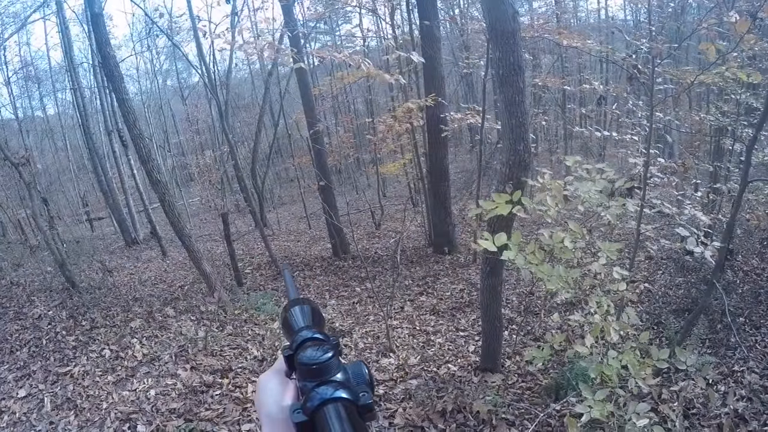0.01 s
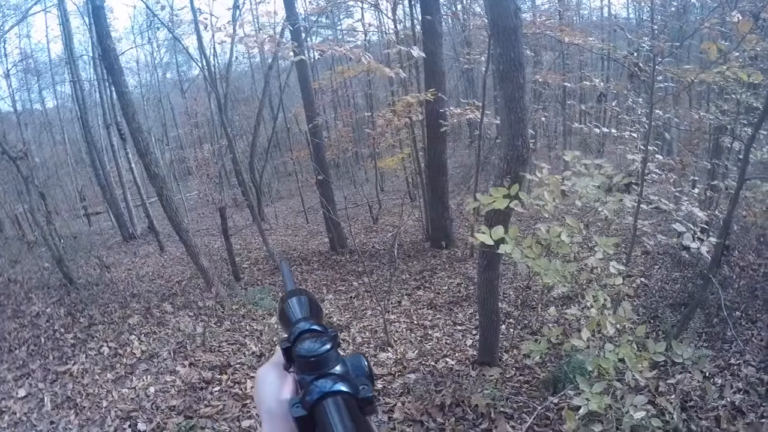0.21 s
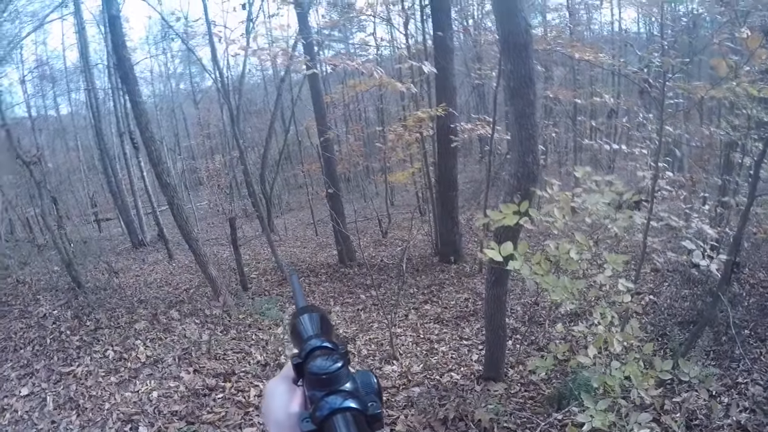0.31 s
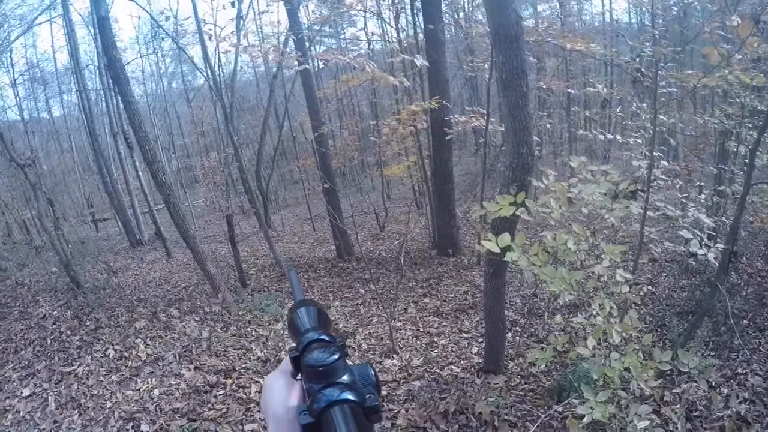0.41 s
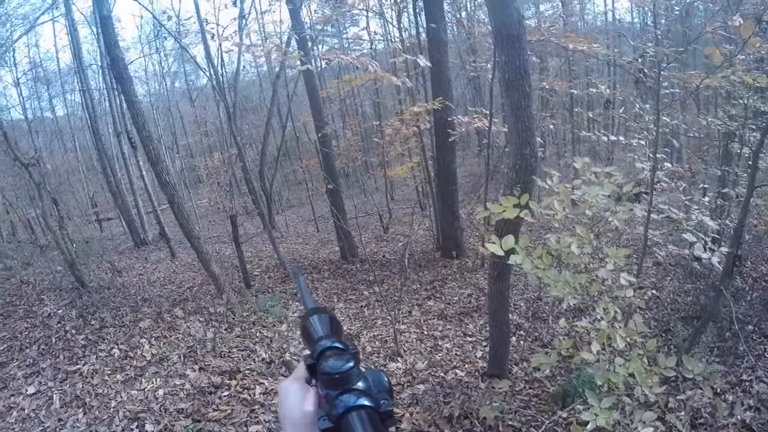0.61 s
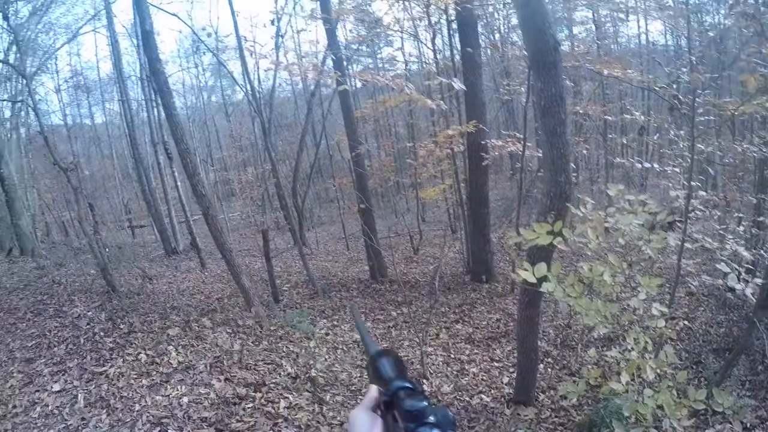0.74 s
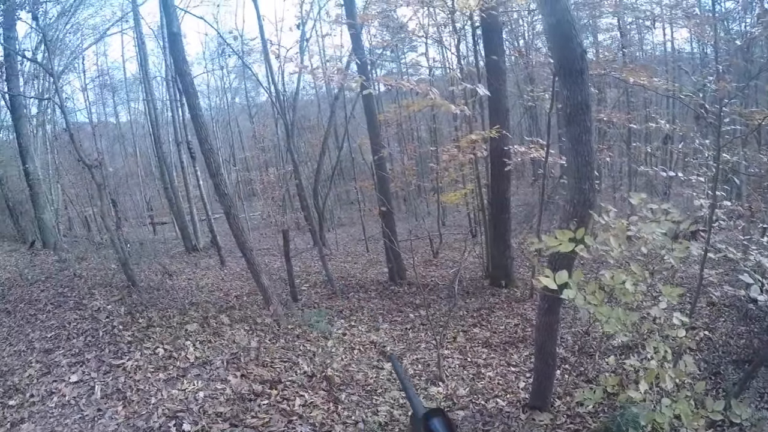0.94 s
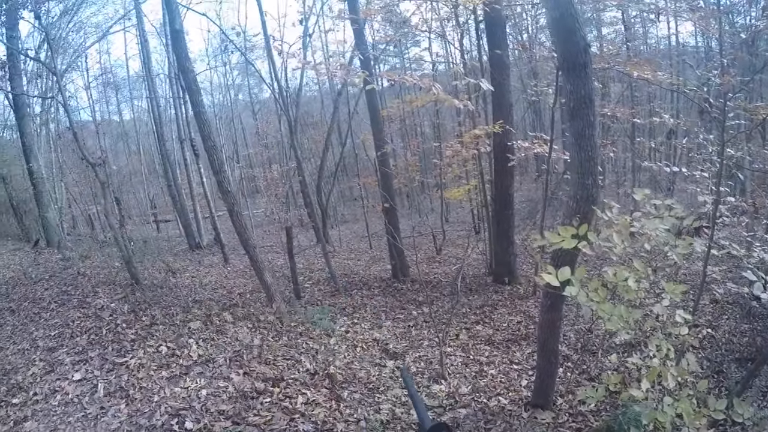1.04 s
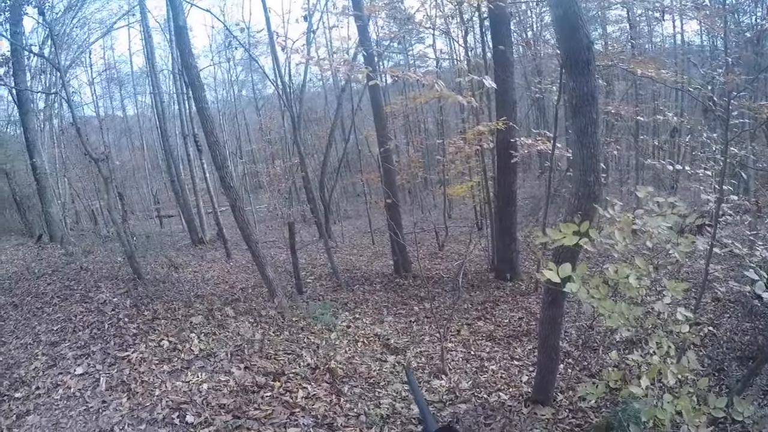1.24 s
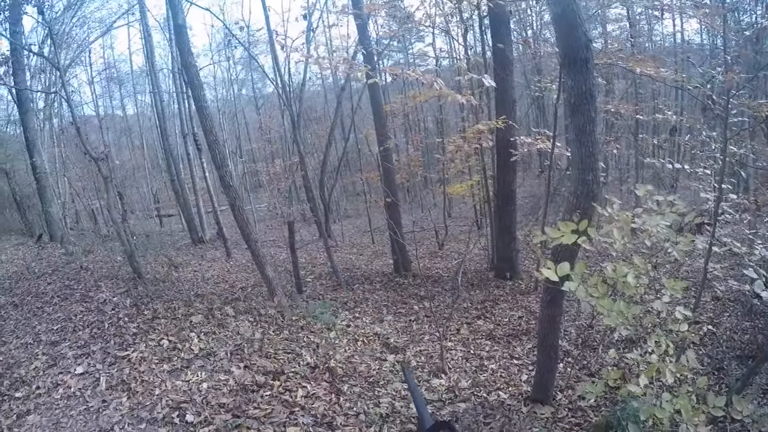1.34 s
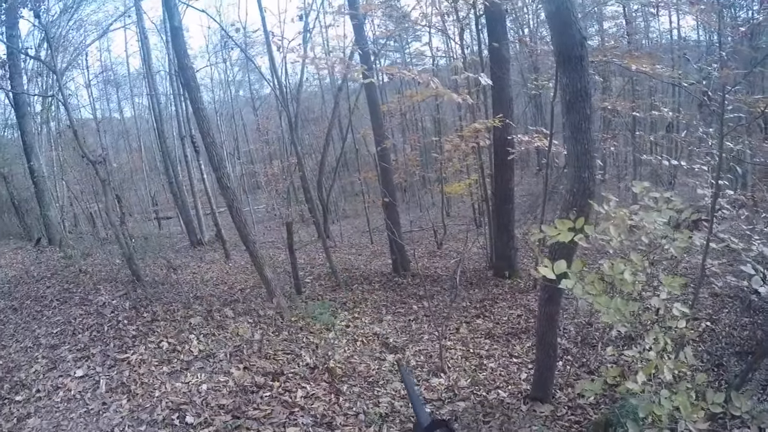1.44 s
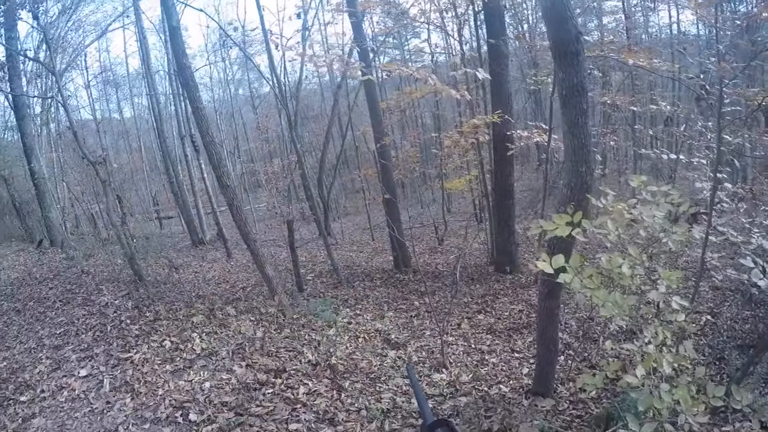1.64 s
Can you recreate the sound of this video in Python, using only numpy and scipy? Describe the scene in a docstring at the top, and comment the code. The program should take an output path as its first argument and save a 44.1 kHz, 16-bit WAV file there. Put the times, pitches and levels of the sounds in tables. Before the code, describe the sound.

A rifle shot bursts out after a brief quiet moment, overloading a head-worn microphone; sharp echoes scatter off tree trunks, a duller roll fades through the woods, then two small metallic clicks as the rifle is lowered.

```python
"""Rifle shot in open woods

One shot heard from the shooter's head: bright noise bursts make the crack, an N-shaped pressure wave the blast.
Spikes with short noise sprays echo from trunks; fading noise bands roll on from forest and slopes, ever duller.
The microphone overloads and its gain ducks, then slowly recovers. The rifle is lowered with a soft
rumble of filtered noise and two small groups of ringing metal clicks, over a faint hiss and one rustle."""
import sys
import numpy as np
from scipy import signal
from scipy.fft import rfft, irfft
from scipy.io import wavfile
from scipy.ndimage import uniform_filter1d

SR = 44100
rng = np.random.default_rng(int(sys.argv[2]) if len(sys.argv) > 2 else 0)


def dump(signal):
    """Clip the signal to [-1, 1] and save it as 16-bit WAV at the path in sys.argv[1]."""
    limited = np.clip(np.atleast_2d(signal).T, -1, 1)
    pcm = np.round(limited * 32767).astype(np.int16)
    wavfile.write(sys.argv[1], SR, pcm)


N = 74970
TIME = np.arange(N) / SR   # s


def from_db(db):
    """Decibels to gain."""
    return 10 ** (np.asarray(db) / 20)


def rms_one(x):
    """Scale to unit rms."""
    return x / np.sqrt(np.mean(x ** 2) + 1e-20)


def at_hz(points, hz):
    """Read every column of a table at a frequency, in between rows on a log scale."""
    freqs, *columns = np.transpose(points)
    return [np.interp(np.log(hz), np.log(freqs), column) for column in columns]


def colour(x, points):
    """Filter with the given spectrum that never sounds ahead of its input; white noise keeps its power."""
    size = 2 * N
    freqs = np.arange(N + 1) * SR / size + 1   # the 1 Hz shift avoids log(0)
    gain = rms_one(from_db(at_hz(points, freqs)[0]))
    # folding the cepstrum onto positive times gives the minimum-phase filter
    cepstrum = irfft(np.log(gain))
    cepstrum[1:N] *= 2
    cepstrum[N + 1:] = 0
    response = np.exp(rfft(cepstrum))
    return irfft(rfft(x, size) * response)[:N]


def butterworth(x, order, hz, kind="low"):
    """Smooth low-pass or high-pass filter."""
    return signal.sosfilt(signal.butter(order, hz, kind, fs=SR, output="sos"), x)


def noise_bands():
    """Quarter-octave bands of noise as (centre Hz, band), unit power per octave."""
    edges = 25.7 * 2 ** (np.arange(38) / 4)
    white = rfft(rng.standard_normal(N))
    freqs = np.fft.rfftfreq(N, 1 / SR)
    for low, high in zip(edges, edges[1:]):
        band = irfft(white * (freqs >= low) * (freqs < high), N)
        yield np.sqrt(low * high), rms_one(band) / 2


def flicker(span_s):
    """Random wobble of rms 1 that changes over the given time."""
    return rms_one(uniform_filter1d(rng.standard_normal(N), max(2, int(span_s * SR))))


def dying(start, t60):
    """Exponential decay from a start time, falling 60 dB in t60 seconds."""
    return (TIME >= start) * np.exp(-np.log(1000) * np.maximum(TIME - start, 0) / t60)


def impulses(rows, scatter, t60):
    """Each row is a spike with a fading noise spray; scatter is the spray's first rms next to the spike."""
    out = np.zeros(N)
    for s, db in rows:
        out += from_db(db) * scatter * dying(s, t60) * rng.standard_normal(N)
        out[min(int(s * SR), N - 1)] += from_db(db)
    return out


def ring(x, hz, t60):
    """One decaying mode: a two-pole resonator struck by x."""
    radius = np.exp(-np.log(1000) / (t60 * SR))
    angle = 2 * np.pi * hz / SR
    feedback = [1, -2 * radius * np.cos(angle), radius * radius]
    return signal.lfilter([0, np.sin(angle)], feedback, x + 1e-18)


# steady hiss of the quiet woods: (f/Hz, level/dB per octave)
AIR_HISS = [(50, -72.5), (350, -65), (900, -75.5), (2400, -67.5), (5500, -67.5), (8000, -73.5),
            (14000, -75.5)]
# spectrum of the faint, high rustle: (f/Hz, relative level/dB)
RUSTLE_SPECTRUM = [(3000, -25), (8000, -12), (9700, 3), (11500, -9), (15000, -10)]
RUSTLE_S, RUSTLE_WIDTH_S, RUSTLE_DB = .85, .035, -70


def air():
    """Faint steady hiss from noise bands, and one brief rustle that swells and fades."""
    swell = np.exp(-((TIME - RUSTLE_S) / RUSTLE_WIDTH_S) ** 2)
    rustle = swell * colour(rng.standard_normal(N), RUSTLE_SPECTRUM)
    hiss = sum(from_db(at_hz(AIR_HISS, hz)[0]) * band for hz, band in noise_bands())
    return hiss + from_db(RUSTLE_DB) * rustle


# loudness of the movement rumble: (t/s, level/dB)
RUMBLE_LEVEL = [(0, -66.5), (.085, -44.5), (.125, -51), (.2, -53.5), (.46, -49), (.53, -62), (1.1, -57.5),
                (1.24, -52.5), (1.45, -53), (1.55, -41.5), (1.62, -50), (1.7, -49)]
# spectrum of the rumble: (f/Hz, relative level/dB)
RUMBLE_SPECTRUM = [(8, -17.5), (20, -3.5), (33, 1), (55, -11), (100, -25), (300, -31), (600, -43),
                   (2000, -76)]


def movement_rumble():
    """Movement at the microphone: low noise whose level rises and falls."""
    noise = rms_one(colour(rng.standard_normal(N), RUMBLE_SPECTRUM))
    return from_db(np.interp(TIME, *np.transpose(RUMBLE_LEVEL))) * noise


# touches of the rifle's metal parts: (t/s, level/dB, low edge f/Hz, share that rings 0-1)
METAL_TOUCHES = [(1.5385, -46, 3000, .8), (1.553, -22, 500, .4), (1.5542, -22.5, 500, .9),
                 (1.5550, -26.5, 700, 0.8), (1.6837, -36, 3500, 0.83), (1.6857, -25, 2005, 0.25),
                 (1.6869, -24.5, 2000, 0.33), (1.6886, -32.5, 2500, .15), (1.6975, -37, 900, .3)]
# spectrum of the dry knocks: (f/Hz, relative level/dB)
KNOCK_SPECTRUM = [(300, -7), (1000, 4), (1450, -5), (2000, 2), (2800, 5.5), (3400, -3), (4000, -1),
                  (5700, 0.5), (7500, -10.5), (11000, -11), (15000, -18.5)]
# ringing modes of the metal: (f/Hz, level/dB, t60/s)
METAL_MODES = [(990, -36, 0.0091), (2770, -27, .007), (4050, -30, 0.0064), (5000, -26, .012),
               (5300, -17.5, 0.023), (5500, -30, .025), (6630, -29, .013)]


def metal_clicks():
    """Metal parts touch: each spike gives a dry knock and strikes modes that ring briefly."""
    knocks, striking = 0, 0
    for s, db, low_hz, ringing_share in METAL_TOUCHES:
        spike = impulses([(s, db)], scatter=.19, t60=.0084)
        touch = butterworth(spike, 2, low_hz, "high")
        knocks = knocks + touch
        striking = striking + ringing_share * touch
    metal = sum(from_db(db) * ring(striking, hz, t60) for hz, db, t60 in METAL_MODES)
    return colour(knocks, KNOCK_SPECTRUM) + metal


RETURNS_START_S, RETURNS_RISE_S = .2225, .007


def returns(table, rough_db, grain_s, patchy_db):
    """Countless small echoes merge into grainy, patchy noise that dies band by band."""
    out = 0
    for hz, band in noise_bands():
        db, t60 = at_hz(table, hz)
        patchy_level = from_db(db + patchy_db * flicker(.025))
        out = out + patchy_level * band * dying(RETURNS_START_S, t60)
    onset = np.clip((TIME - RETURNS_START_S) / RETURNS_RISE_S, 0, 1)
    grain = rms_one(from_db(rough_db * flicker(grain_s)))
    return out * onset * grain


# diffuse returns from the forest: (f/Hz, level/dB per octave, t60/s)
FOREST_RETURNS = [(60, -56, 2.1), (189.6, -46, 1.59), (347, -29, 1.5), (990, -27.5, 1.6), (2018, -20, 1.74),
                  (3052, -17, 1.42), (3653, -25, 1.47), (6003, -25.5, 1.114), (7900, -37.5, 1.0),
                  (14000, -53, 0.59)]
# diffuse returns from far slopes: (f/Hz, level/dB per octave, t60/s)
SLOPE_RETURNS = [(101, -68.5, 3), (214.2, -55, 5), (356, -39.5, 5.1), (693.6, -42, 4.91), (1279, -37, 4.5),
                 (2560, -38.5, 4.74), (3053, -42, 4.4), (3600, -54, 3.5), (7000, -76.5, 2.6)]
# diffuse returns from undergrowth: (f/Hz, level/dB per octave, t60/s)
UNDERGROWTH_RETURNS = [(40, -26, 0.51), (120.2, -19, 0.41), (399.3, -19, 0.5), (1000, -23.5, 0.51),
                       (2530, -8.5, 0.51), (5700, -4, 0.37), (7800, -14.5, .38), (14000, -14, 0.28)]
# the rolling echo swells, or dips, as slopes answer: (t/s, width/s, gain/dB)
SLOPE_SWELLS = [(.575, .055, 2), (.91, 0.028, -1.5), (.975, 0.024, 3), (1.095, 0.037, 3.5),
                (1.43, 0.051, 2.5)]


def woods():
    """The undergrowth's echo fades fastest; forest and slopes roll on in swells."""
    forest = returns(FOREST_RETURNS, rough_db=1.5, grain_s=.003, patchy_db=1.3)
    slopes = returns(SLOPE_RETURNS, rough_db=.63, grain_s=.006, patchy_db=1.45)
    undergrowth = returns(UNDERGROWTH_RETURNS, rough_db=2.0, grain_s=.002, patchy_db=.93)
    swell_db = sum(db * np.exp(-((TIME - s) / width) ** 2) for s, width, db in SLOPE_SWELLS)
    return undergrowth + from_db(swell_db) * (forest + slopes)


# sharp echoes from single trunks: (t/s, level/dB)
TRUNK_ECHOES = [(0.2298, 6), (0.2323, 0), (0.2395, 16.5), (0.2408, 12), (0.2505, -9), (0.2524, 19),
                (0.2555, 22.5), (0.2585, 12), (0.2788, 14), (0.2807, 5), (0.2868, 16), (0.2882, 3),
                (0.2897, 17.5), (0.3005, -7), (0.3062, 2), (0.3222, 5), (0.3240, -2), (0.3258, -9),
                (0.3328, 2), (0.3490, 2), (0.3505, -4), (0.3745, -2)]
# their spectrum: (f/Hz, relative level/dB)
TRUNK_SPECTRUM = [(100, -10), (400, -7.5), (900, -7.5), (2000, 0), (3500, 1), (5800, 0.5), (7500, -24),
                  (15000, -21.5)]
# low thuds of the blast off ground and thick trunks: (t/s, level/dB)
BLAST_THUDS = [(0.2395, 15), (0.2556, 8), (0.2600, 10.5), (0.2885, -2), (0.3225, 5), (0.3270, 7)]
# their spectrum: (f/Hz, relative level/dB)
THUD_SPECTRUM = [(30, -14), (70, -5), (130, 0), (220, -5), (320, -1), (550, -9), (1000, -25), (3000, -55)]
# dull, distant slaps: (t/s, level/dB)
FAR_SLAPS = [(0.6420, -14), (0.8229, -16), (0.8238, -10), (0.9612, -16.5)]
# their spectrum: (f/Hz, relative level/dB)
SLAP_SPECTRUM = [(300, -20), (750, -9), (1100, 4.5), (2000, 0), (3000, -11), (5000, -38), (12000, -67)]


def echoes():
    """Single reflections as filtered spikes: sharp near trunks, low thuds and far slaps."""
    trunks = colour(impulses(TRUNK_ECHOES, scatter=.165, t60=.015), TRUNK_SPECTRUM)
    thuds = colour(impulses(BLAST_THUDS, scatter=.03, t60=.03), THUD_SPECTRUM)
    slaps = colour(impulses(FAR_SLAPS, scatter=.06, t60=.031), SLAP_SPECTRUM)
    return trunks + thuds + slaps


# the blast's brief ring: (f/Hz, level/dB, t60/s)
BLAST_MODES = [(285, -41.5, 0.026), (435, -42, .022), (620.7, -40, .025)]
BLAST_S, BLAST_LENGTH_S, BLAST_DB = .2229, .00647, 19.5
BLAST_LOW_HZ, BLAST_HIGH_HZ = 25, 1020
BLAST_BEND = .82   # below 1 the pressure swings back early


def blast():
    """The muzzle's N-shaped pressure wave, band-limited, sets off a brief ring."""
    phase = (TIME - BLAST_S) / BLAST_LENGTH_S
    wave = (2 * np.clip(phase, 0, 1) ** BLAST_BEND - 1) * (phase >= 0) * (phase < 1)
    wave = butterworth(wave, 2, BLAST_HIGH_HZ)
    wave = butterworth(wave, 1, BLAST_LOW_HZ, "high")
    slope = np.gradient(wave)
    body = 0
    for hz, db, t60 in BLAST_MODES:
        body = body + from_db(db) * ring(slope, hz, t60) * SR / (2 * np.pi * hz)
    return from_db(BLAST_DB) * (wave + body)


# bright bursts from the action to the muzzle crack and its ground bounce: (t/s, length/s, level/dB)
CRACK_BURSTS = [(0.2138, 0.0023, -14), (0.2165, 0.0034, 4), (0.217, 0.00032, 3.5), (0.2203, .0024, 27),
                (0.2274, 0.00067, 21)]
# their spectrum: (f/Hz, relative level/dB)
CRACK_SPECTRUM = [(200, -18), (1000, -11.5), (1500, -6.5), (2500, 0), (4000, -0.5), (6000, 3.5),
                  (7500, -9.5), (12000, -7.5), (16000, -6.5)]


def crack():
    """Very short bursts of bright noise: each starts at once, holds, then drops sharply."""
    level = 0
    for s, length, db in CRACK_BURSTS:
        fall = np.exp(-np.maximum(TIME - s - length, 0) / .000097)
        level = level + from_db(db) * (TIME >= s) * fall
    return colour(level * rng.standard_normal(N), CRACK_SPECTRUM)


def scene():
    """Everything at one microphone."""
    shot = crack() + blast()
    answer = echoes() + woods()
    handling = metal_clicks() + movement_rumble()
    return (shot + answer + handling + air())[None]


OVERLOAD_DB, CEILING_DB = 14, -.67
RELEASE_DB_PER_S, LOOKAHEAD_S = 11, .00821
CUTOFF_HZ = 15800


def record(dry):
    """The input overloads, the gain ducks just ahead of loud peaks and recovers slowly, the top is cut."""
    top = from_db(OVERLOAD_DB)
    x = top * np.tanh(dry[0] / top)
    over_db = np.maximum(20 * np.log10(np.abs(x) + 1e-9) - CEILING_DB, 0)
    # hold the largest duck so far, less what has been released since
    release_db = RELEASE_DB_PER_S * TIME
    duck_db = np.maximum.accumulate(over_db + release_db) - release_db
    early_db = np.interp(TIME + LOOKAHEAD_S, TIME, duck_db)
    x = x * from_db(-uniform_filter1d(early_db, size=64))
    return signal.sosfilt(signal.ellip(10, .1, 70, CUTOFF_HZ, fs=SR, output="sos"), x)[None]


dry = scene()
out = record(dry)
dump(out)
```